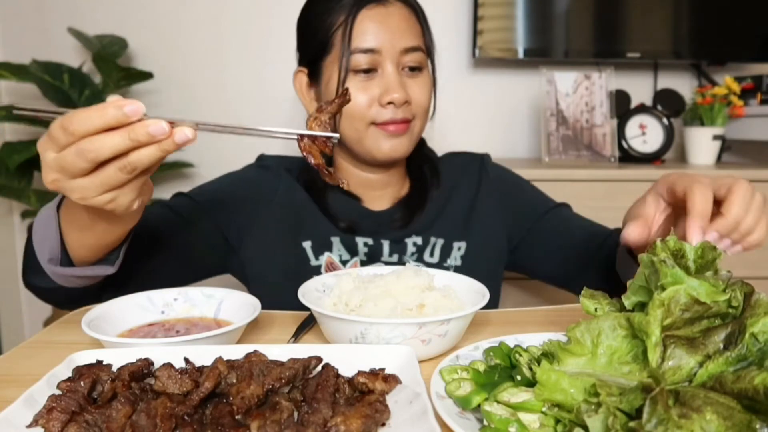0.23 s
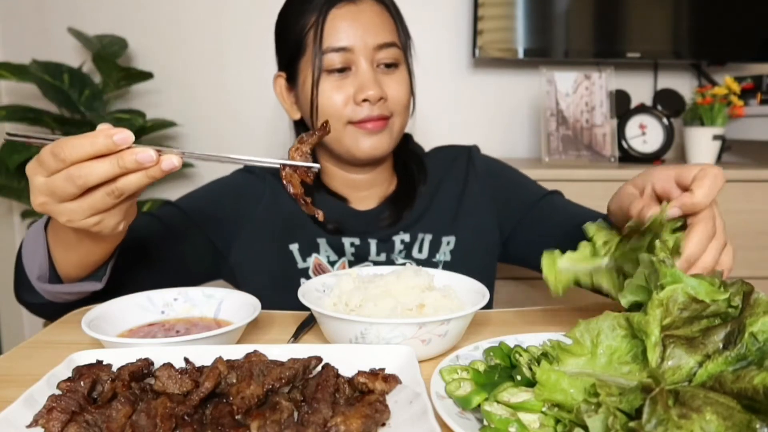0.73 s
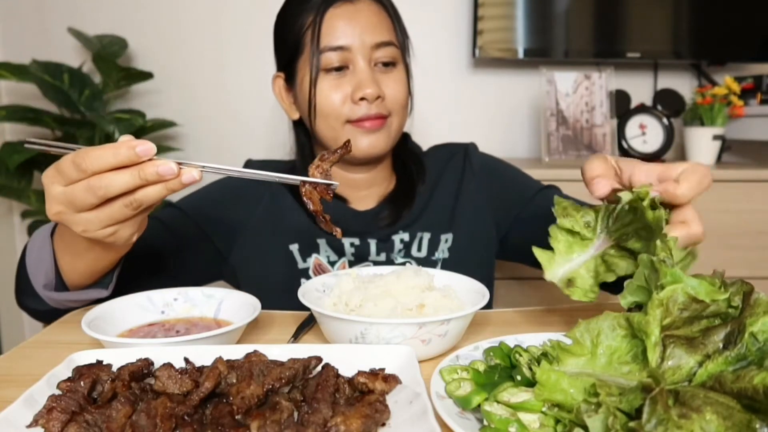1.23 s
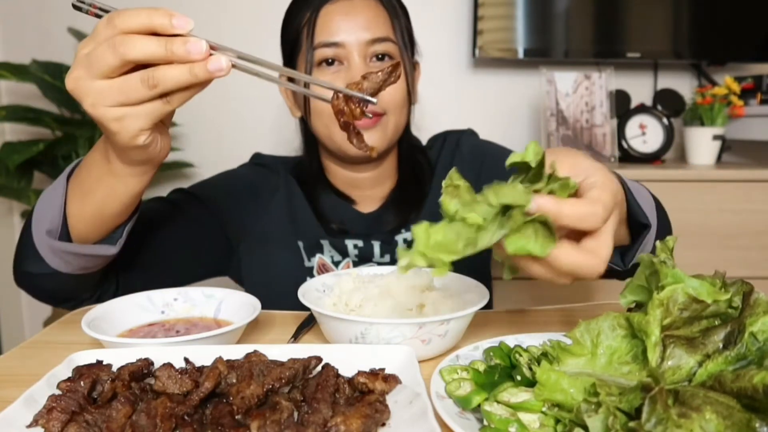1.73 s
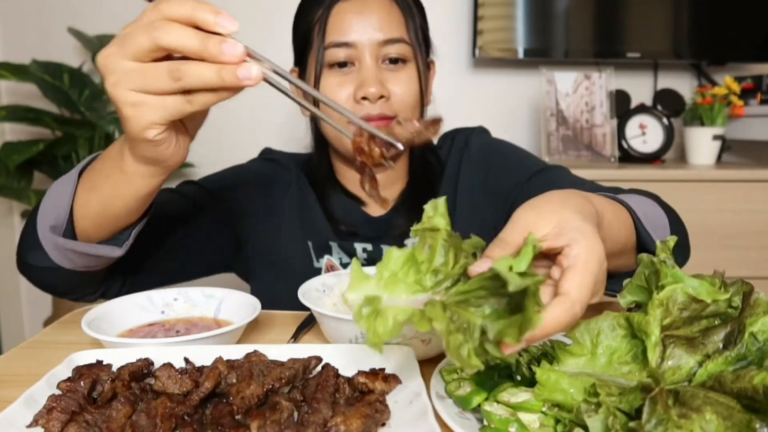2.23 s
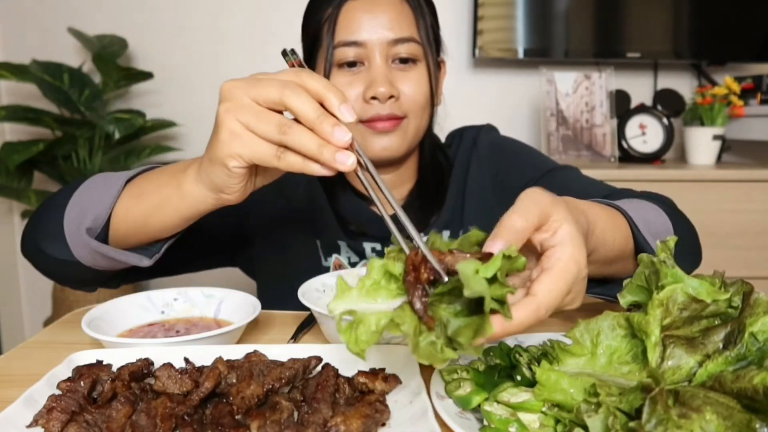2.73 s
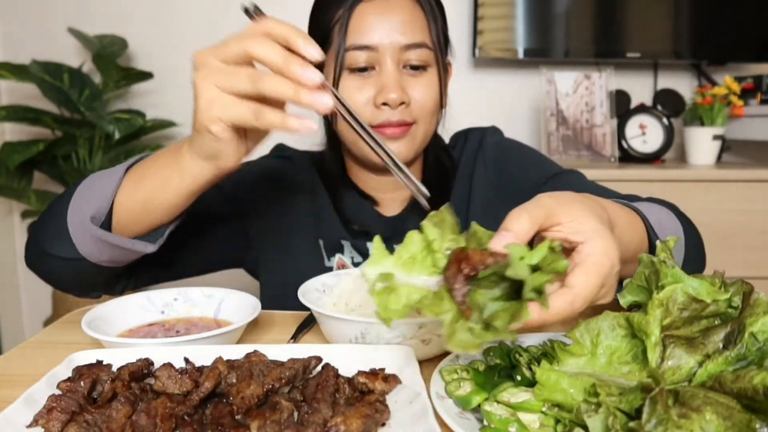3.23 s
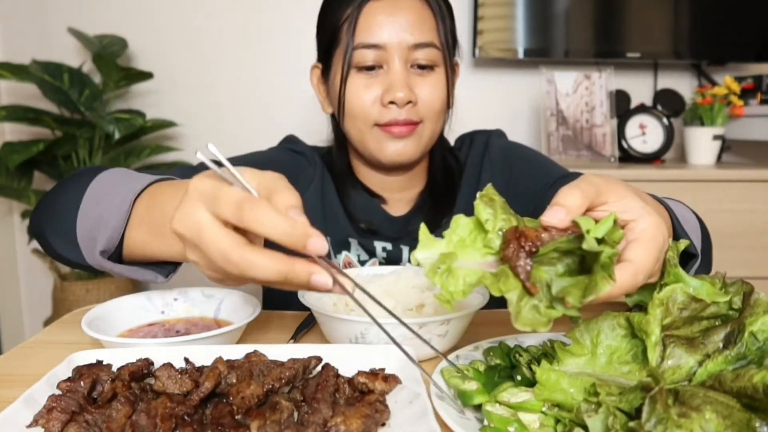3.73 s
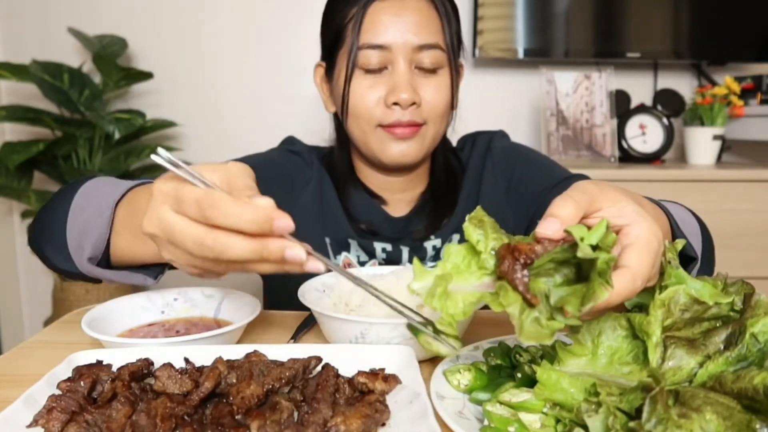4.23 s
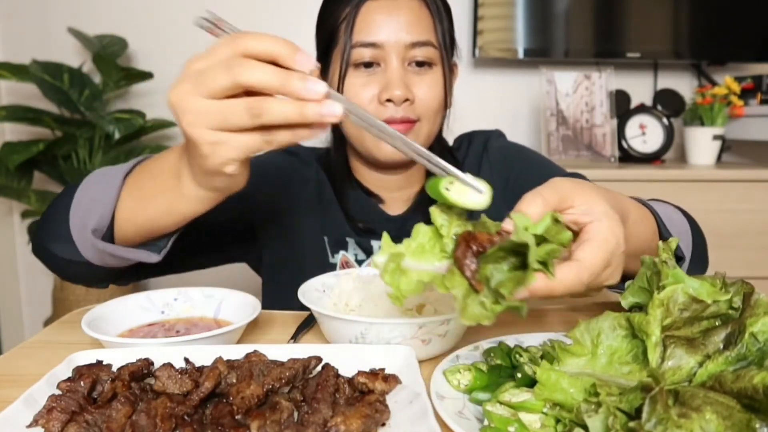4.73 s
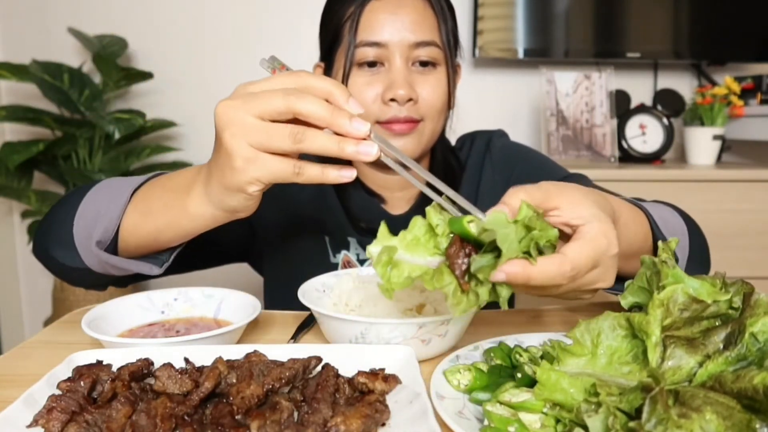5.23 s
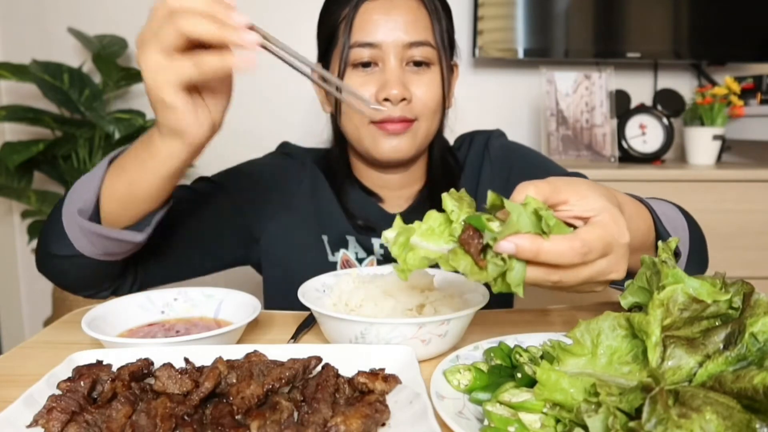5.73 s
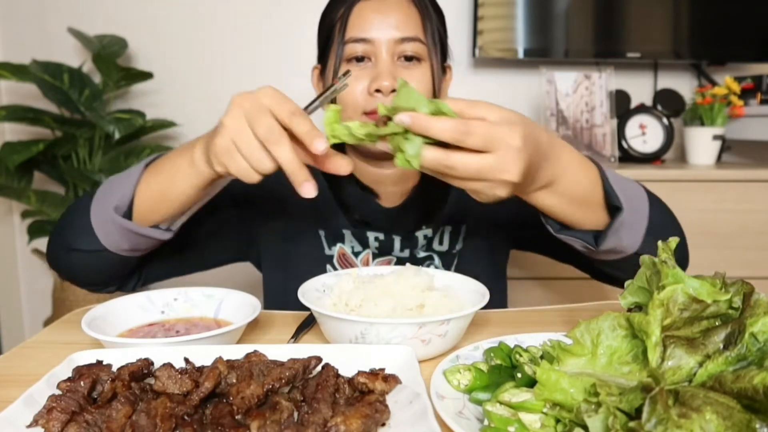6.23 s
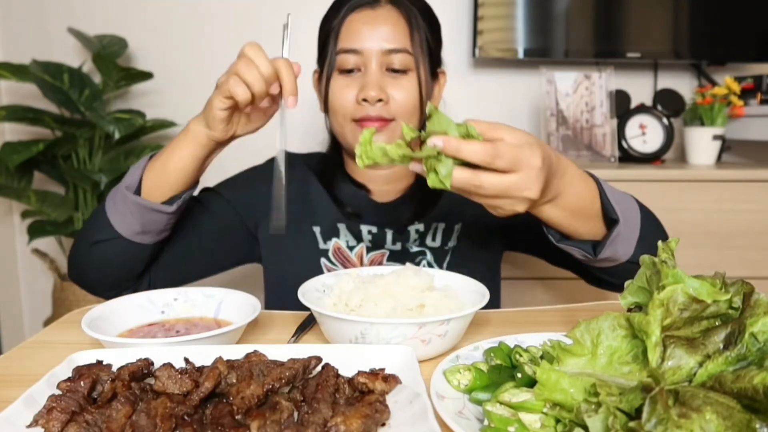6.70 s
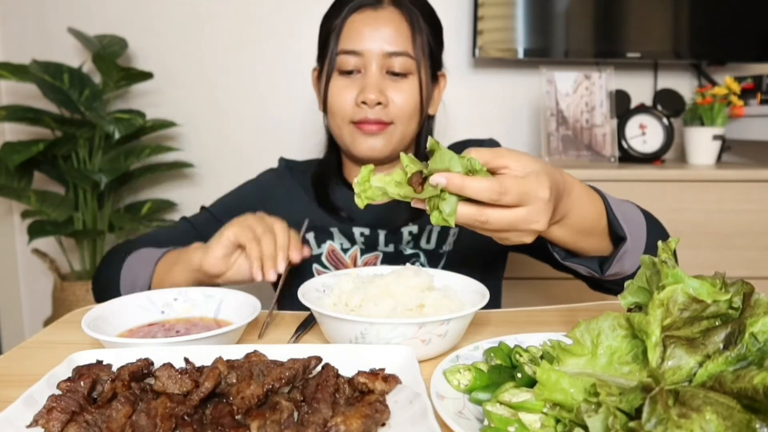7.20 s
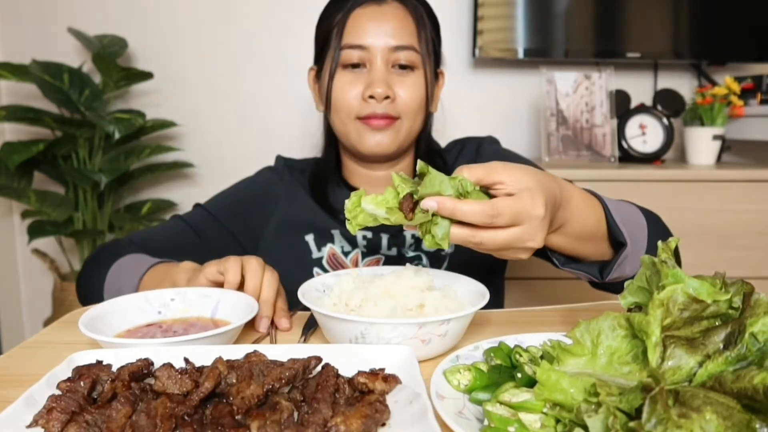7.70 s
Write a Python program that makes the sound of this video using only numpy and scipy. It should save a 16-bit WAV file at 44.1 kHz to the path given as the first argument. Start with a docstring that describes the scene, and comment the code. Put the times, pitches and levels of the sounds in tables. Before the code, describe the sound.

Close to the microphone in a small quiet room, lettuce is picked and shaken with crisp crackles and small wet snaps for two seconds. Softer rustles follow, then steel chopsticks tap a plate briefly. After near silence and faint leaf folds, the sticks knock and scrape on a wooden table, clink, strike a bowl and land hard with a sharp clatter. Faint hiss and hum lie beneath.

```python
"""A dining table in a small quiet room, where lettuce leaves are picked, shaken and folded close by.
The leaves crackle from many tiny filtered clicks, and snap with short noise bursts and two brief rings.
Steel chopsticks tap a plate, tick in the fingers, later slide along the wooden table, clink together,
knock a bowl and are dropped flat: short clicks and rough slips set off the ringing tones of each thing.
Room hiss, a low hum and a thin high whine, made of filtered noise and wavering tones, lie under it all."""
import sys
import numpy as np
from scipy import signal
from scipy.fft import rfft, irfft
from scipy.io import wavfile
from scipy.ndimage import uniform_filter1d

SR = 44100
rng = np.random.default_rng(int(sys.argv[2]) if len(sys.argv) > 2 else 0)


def generate_wav(signal):
    """Clip the signal to [-1, 1] and save it as 16-bit WAV at the path in sys.argv[1]."""
    frames = np.transpose(np.atleast_2d(signal))
    scaled = np.clip(frames, -1, 1) * 32767
    pcm = np.round(scaled).astype(np.int16)
    wavfile.write(sys.argv[1], SR, pcm)


N = 351036  # length in samples


def gain_of(db):
    """Turns decibels into a plain multiplier."""
    return 10 ** (np.asarray(db) / 20)


def evened(x):
    """Scales a signal to an average (rms) size of 1."""
    return x / np.sqrt(np.mean(x ** 2) + 1e-20)


def read(points, hz):
    """Reads a table between its points, with frequency on a log axis."""
    f, value = np.transpose(points)
    return np.interp(np.log(hz + 1), np.log(f + 1), value)


def add(mix, s, sound):
    """Mixes a sound in at second s."""
    part = mix[round(s * SR):][:len(sound)]
    part += sound[:len(part)]


def patches(hz, at, bins, frames):
    """Random smooth blotches over frequency and time, rms 1."""
    blotches = uniform_filter1d(rng.standard_normal((len(at), len(hz))), size=bins)
    return evened(uniform_filter1d(blotches, size=frames, axis=0)).T


def coloured(x, db_of, size=256):
    """Raises or lowers each frequency at each moment by db_of(Hz, s)."""
    hz, t, z = signal.stft(x, SR, nperseg=size)
    return signal.istft(z * gain_of(db_of(hz[:, None], t)), SR, nperseg=size)[1][:len(x)]


def tilted(x, slope_db):
    """Tips the balance of low and high about 2 kHz, in dB per octave, levelling off in the deep bass."""
    octaves = np.log2(np.fft.rfftfreq(len(x), 1 / SR) / 2000 + 0.066)
    return irfft(rfft(x) * gain_of(slope_db * octaves), len(x))


def above(x, edge_hz, order):
    """High-pass: keeps what lies above the edge."""
    return signal.sosfilt(signal.butter(order, edge_hz, "high", fs=SR, output="sos"), x)


def grains(per_s, spread_db):
    """Random clicks of either sign and uneven size, evened to rms 1."""
    size = gain_of(spread_db * np.minimum(rng.exponential(1, N), 4))
    sign = rng.choice([-1., 1.], N)
    return evened(size * sign * (rng.random(N) < per_s / SR))


# colour of the hiss: f/Hz, relative level/dB (per Hz)
HISS_COLOUR = [(20, -40.5), (36, -8.5), (50, -19.5), (83, -13.5), (130, -10.5), (208, -13.5), (270, -16),
               (420, -17.5), (584, -18.5), (700, -23), (2230, -30.5), (4000, -34.5), (7600, -35),
               (15700, -35.5)]
HISS_DB = -67.5  # rms of the hiss above 80 Hz
# colour of the hiss that differs left and right: f/Hz, relative level/dB (per Hz)
SIDE_COLOUR = [(59, -45), (100, -32), (356, -8), (396, -14.5), (430, -7), (643, -12), (15700, -12.5)]
SIDE_DB = -75  # its rms
# wavering tones of hum and whine: f/Hz, speed limit of the wavering/Hz, level/dB (before the lift)
HUM_TONES = [(58.4, 3.6, -66), (240.6, 20, -73), (344, 19, -79), (7850, 0.68, -83.5)]
HUM_LIFT_DB, HUM_WAVER_DB, HUM_WAVER_CYCLES = 2, 0.74, 0.15  # the two wavers are rms


def floor():
    """Steady filtered hiss, tones that waver in level and phase, and a little hiss unlike left and right."""
    a, b = rng.standard_normal((2, N))
    hz = np.fft.rfftfreq(N, 1 / SR)
    t = np.arange(N) / SR
    hiss = irfft(rfft(a) * gain_of(read(HISS_COLOUR, hz)), N)
    hiss *= gain_of(HISS_DB) / np.std(irfft(rfft(hiss) * (hz > 80), N))
    middle = hiss
    for f, width, db in HUM_TONES:
        drift = evened(irfft(rfft(rng.standard_normal(N)) * np.exp(-(hz / width) ** 2), N))
        level = gain_of(db + HUM_LIFT_DB + HUM_WAVER_DB * drift)
        # the phase follows the same drift, one second late
        cycles = f * t + HUM_WAVER_CYCLES * np.roll(drift, SR)
        middle = middle + level * np.sin(2 * np.pi * cycles)
    side = gain_of(SIDE_DB) * evened(irfft(rfft(b) * gain_of(read(SIDE_COLOUR, hz)), N))
    return np.array([middle + side, middle - side])


# how long the room rings: f/Hz, time to fall 60 dB t60/s
ROOM_DECAY = [(200, 0.55), (1000, 0.33), (4000, 0.21), (12000, 0.3)]


def room(x):
    """Sparse echoes of random sign, each band dying at its own speed."""
    taps, at = np.zeros(SR // 2), np.arange(150, SR // 2 - 20, 20)
    taps[at + rng.integers(0, 20, len(at))] = rng.choice([-1., 1.], len(at))
    tail = coloured(taps, lambda hz, t: -60 * t / read(ROOM_DECAY, hz))
    return signal.oaconvolve(x, tail / np.linalg.norm(tail))[:N]


def ringing(modes, contact, tick_db, tick_s):
    """Answer of a struck thing: its dying tones (modes) and the dry noise of the contact."""
    t = np.arange(SR // 2) / SR
    ring = sum(gain_of(db - 60 * t / t60) * np.sin(2 * np.pi * hz * t) for hz, db, t60 in modes)
    tick = evened(coloured(rng.standard_normal(len(t)), lambda hz, at: read(contact, hz)))
    return ring + gain_of(tick_db - 60 * t / tick_s) * tick


def blows(rows, body):
    """Each blow is a first contact and a short chatter; where it lands favours some modes."""
    out, t = np.zeros(N), np.arange(-256, 3840) / SR
    hz = np.fft.rfftfreq(len(t), 1 / SR) + 1
    noises = rng.standard_normal((len(rows), len(t)))
    for (s, db, slope_db, ms, place_hz, place_db, grip_db), noise in zip(rows, noises):
        chatter = 0.084 * noise * (t > 0) * np.exp(-abs(t) * 1000 / ms)
        push = tilted((t == 0) + chatter, slope_db)
        favour = gain_of(place_db * np.exp(-(np.log2(hz / place_hz) / 0.65) ** 2))
        sound = signal.fftconvolve(irfft(rfft(push) * favour), body)
        # the grip damps the ring
        sound *= gain_of(-grip_db * np.arange(len(sound)) / SR)
        add(out, s + t[0], gain_of(db) * sound / abs(sound).max())
    return out


def slide(rows, body, shift_db):
    """Dense uneven slips under the moving tips; the modes swell and sink as the contact wanders."""
    s, db, slope_db = np.transpose(rows)
    t = np.arange(s[0], s[-1], 1 / SR)
    slips = grains(per_s=4500.0, spread_db=0.5)[:len(t)] * gain_of(np.interp(t, s, db))
    rubbed = signal.oaconvolve(slips, body / np.linalg.norm(body))

    def wandering(hz, at):
        slope = np.interp(at + s[0], s, slope_db) * np.log2(hz / 2000 + 0.026)
        return slope + shift_db * patches(hz, at, bins=5, frames=3)
    out = np.zeros(N)
    add(out, s[0], coloured(rubbed, wandering, size=512))
    return out


# In the tables of the sticks, levels hold before the filters in sticks().
# Modes have t60, the time to fall 60 dB with no grip on them. All blows have the same columns:
# t/s, peak level/dB, slope/(dB per octave), chatter/ms, favoured f/Hz, favour/dB, grip damping/(dB per s)

# contact noise on soft things: f/Hz, relative level/dB (per Hz)
SOFT_CONTACT = [(300, -28), (600, -25.5), (1000, 6), (2500, -8.5), (4200, 1), (6500, -16), (7200, -25.5),
                (10000, -31.5), (15700, -46.5)]
# modes of the wood under the tips: f/Hz, relative level/dB, t60/s
WOOD_MODES = [(830, -18, 0.063), (984, 3, 0.069), (1081.5, 4, 0.1), (1181, 6, 0.13), (1230, -4.5, 0.041),
              (1756, 9.5, 0.03), (2120, 4, 0.031), (2206, -16, 0.055), (2646, 3, 0.036), (2693, 8, 0.035),
              (2990, -15.5, 0.044), (2970, -13.5, .04), (3500, -3.5, 0.1), (3586, 5.5, 0.032),
              (3630, 5, 0.024), (3950, -4, 0.21), (4200, -8.5, 0.02), (4340, -16.5, 0.045),
              (4800, -5.5, 0.029), (5000, -20.5, .04), (5680, -21, 0.081), (5960, -36.5, 0.066),
              (6000, -18, 0.061)]


def wood_ring():
    """How the wooden table answers under the tips."""
    return ringing(WOOD_MODES, SOFT_CONTACT, tick_db=16.0, tick_s=0.029)


# contact noise on hard things: f/Hz, relative level/dB (per Hz)
HARD_CONTACT = [(300, -41.5), (900, -1), (2000, -8), (5000, -1), (7000, -12.5), (10000, -6), (15700, -20.5)]
# modes of the plate: f/Hz, relative level/dB, t60/s
PLATE_MODES = [(960, -12.5, 0.16), (1115, 0, 0.027), (1570, -22, 0.072), (1950, 1.5, 0.033),
               (2300, -33, 0.031), (2906, -2, 0.062), (3400, -26, 0.037), (3826, 0, 0.27), (3858, -2, 0.12),
               (4480, -12, 0.036), (4840, -0.5, 0.079), (5350, -10, .04), (5550, 2.5, 0.024),
               (5700, -0.5, 0.056), (7160, -15, 0.095), (7640, -20, 0.66), (8660, -7, 0.059),
               (10300, -11, 0.088), (10930, -13, .06), (13710, -20, .1), (15550, -19, 0.085)]


def plate_ring():
    """How the plate answers under the tips."""
    return ringing(PLATE_MODES, HARD_CONTACT, tick_db=1.0, tick_s=0.026)


# modes of the steel sticks: f/Hz
STEEL_F = [797, 960, 1798, 2216, 3366, 3372, 4466, 4553, 5809, 6821, 7666, 9085, 9145, 10050, 10915, 12152,
           13343, 13388, 14340]
# the same modes in the same order: relative level/dB, t60/s
STEEL_LEVEL_T60 = [(-6.5, 0.22), (-7.5, 0.26), (-11.5, 0.13), (-2, 0.1), (-20, 2.1), (-7.5, 0.12),
                   (5, 0.051), (-15, 0.17), (-11, 0.25), (-32.5, .3), (-22, 0.42), (-26, .15),
                   (-10.5, 0.16), (-25, .1), (-28, .33), (-14.5, 0.16), (-13.5, 0.29), (-5.5, .16),
                   (-31.5, .12)]


def steel_ring():
    """How the steel sticks themselves answer."""
    modes = np.column_stack([STEEL_F, STEEL_LEVEL_T60])
    return ringing(modes, HARD_CONTACT, tick_db=-6.0, tick_s=0.022)


# modes of the rim of a bowl: f/Hz, relative level/dB, t60/s
BOWL_MODES = [(930, -9, .04), (2530, -4, .03), (2690, -6, .04), (3007, -5, .05), (3205, -8, .04),
              (4083, -5, .04), (4237, 0, .12), (4760, -12, .08), (5020, -14, .08), (5660, -9, .04),
              (6500, -14, .03), (8430, -16, .05), (8895, -10, .03), (9125, -13, .06), (9900, -17, .03),
              (12170, -22, .05)]


def bowl_ring():
    """How the rim of the bowl answers."""
    return ringing(BOWL_MODES, SOFT_CONTACT, tick_db=-5.5, tick_s=0.017)


# modes of the whole table top: f/Hz, relative level/dB, t60/s
TOP_MODES = [(200, -26, .08), (350, -20, .04), (470, -11, .035), (620, -14, .03), (780, -6, .03),
             (1000, -10, .03), (1300, -4, .02), (1530, 0, .02), (1760, -1, .025), (2400, -14, .015)]


def table_top_ring():
    """How the whole table top answers, dull and quickly dying."""
    return ringing(TOP_MODES, SOFT_CONTACT, tick_db=0.5, tick_s=0.016)


# taps on the plate, columns as all blows
PLATE_BLOWS = [(3.669, -20, -2, 3.6, 4480, 6, 48), (3.701, -23.5, -6, 2.9, 5000, 10, 50),
               (3.802, -31.5, 2.5, 3.6, 11000, 3, 391), (3.869, -32, 0, 20, 6800, 4, 150)]
# tips skittering over the plate: t/s, level/dB (of the slips), slope/(dB per octave)
PLATE_SKITTER = [(3.672, -34, -3), (3.69, -39, -1.5), (3.712, -33.5, 1), (3.736, -41, -5.5),
                 (3.8, -47, -3.5)]


def on_plate(plate):
    """Tips tap the plate and skitter over it, setting off its modes."""
    return blows(PLATE_BLOWS, plate) + slide(PLATE_SKITTER, plate, shift_db=3.5)


# knocks on the wood, columns as all blows
WOOD_BLOWS = [(7.1755, -14, 3.5, 2.5, 3000, 1.2, 880), (7.179, -11.5, -1.2, 1.1, 3000, 0.9, 600),
              (7.475, -17, -7.5, 5.5, 1000, 4, 50.2), (7.499, -19.5, -8.5, 21, 1200, 4, 50.2),
              (7.5715, -8, -1.5, 1.8, 3000, 3.3, 2490), (7.5735, -11, 0, 1.5, 2530, 3, 2450)]
# sticks dragged along the table: t/s, level/dB (of the slips), slope/(dB per octave)
WOOD_SLIDE = [(7.18, -51, 12), (7.186, -27.5, -2), (7.334, -21.5, 1.5), (7.38, -21, 3), (7.468, -53.5, -2)]


def on_wood(wood):
    """Sticks knock on the wooden table and drag along it, setting off the modes under the tips."""
    return blows(WOOD_BLOWS, wood) + slide(WOOD_SLIDE, wood, shift_db=2.0)


# contact noise of steel on steel: f/Hz, relative level/dB (per Hz)
PINCH_CONTACT = [(1000, -26), (3000, -6), (5500, -0.5), (8000, -2), (12000, -2.5), (15700, -1)]
# modes of the sticks pinched in the fingers: f/Hz, relative level/dB, t60/s
PINCHED_MODES = [(4200, -20, .04), (4960, -9, 0.11), (5900, -12, .1), (7300, -15, .06), (8220, -8, .14),
                 (8820, -20, .05), (10300, -3.5, 0.058), (12300, -13, .04), (13200, -16, .04),
                 (14600, -16, .04)]
# ticks as the grip shifts, columns as all blows
GRIP_BLOWS = [(5.742, -47.5, 0, 2, 10300, 6, 200), (5.959, -50, -3, 2, 4200, 8, 200),
              (5.970, -36, 4, 3, 13000, 3, 300), (5.979, -33, 3.5, 7.5, 5700, 3.3, 50),
              (5.988, -48, 2, 5.3, 12300, 4.5, 50), (6.080, -44, 0, 4.4, 10300, 3, 20),
              (6.097, -44, 2.5, 5, 9000, 4, 20), (6.599, -53, 1, 2, 6200, 9.9, 50)]


def in_fingers():
    """Pinched sticks tick as the grip shifts."""
    return blows(GRIP_BLOWS, ringing(PINCHED_MODES, PINCH_CONTACT, tick_db=2.5, tick_s=0.065))


# clinks of the steel sticks, columns as all blows
STEEL_BLOWS = [(7.474, -8.5, -.5, 7.4, 2300, 1.6, 150), (7.498, -15, .5, 6.4, 8820, 5, 100),
               (7.585, -27.5, .5, 1.5, 9430, 11, 450), (7.6206, -25, .5, 1.2, 11060, 5.5, 5)]
# knocks on the bowl, columns as all blows
BOWL_BLOWS = [(7.6003, -5, 0.52, 4.4, 2990, 2, 25), (7.6047, -5, .5, 1.9, 2700, 3, 38),
              (7.6085, -7, 0.36, 3, 4240, 2.2, 5)]
# dull knocks of the table top, columns as all blows
TOP_BLOWS = [(3.869, -36.5, -9, 6.3, 300, 5.8, 5), (3.897, -42, -8, 13, 368, 10, 5),
             (7.579, -22.5, 3.5, 2.1, 1820, 2, 43), (7.585, -13.5, 0.5, 10.8, 1200, 1.85, 39),
             (7.6152, -1, 3.5, 1.1, 1516, 2, 82), (7.6195, -4, 3.5, 3.04, 948, 13.3, 63),
             (7.821, -47, -1.5, 3.5, 1490, 6.1, 50)]
RATTLE_DB = 2.5  # loose contact makes each ring flicker by this much (rms)


def sticks():
    """Every contact of the chopsticks; thin sticks give off little bass, so the lows are held back."""
    wood, plate, steel = wood_ring(), plate_ring(), steel_ring()
    bowl, top = bowl_ring(), table_top_ring()
    light = on_plate(plate) + blows(STEEL_BLOWS, steel)
    light += on_wood(wood) + blows(BOWL_BLOWS, bowl)
    light += in_fingers()
    light = coloured(light, lambda hz, at: RATTLE_DB * patches(hz, at, bins=3, frames=2))
    bass_trace = gain_of(-18.0) * light  # comes through the table
    return above(light, 756.0, order=5) + bass_trace + above(blows(TOP_BLOWS, top), 240.0, order=2)


# each squeeze, pull or fold of the leaves:
# peak t/s, rustle level/dB, swell/s, fade/s, treble over it/dB, body (lower part) over it/dB
LEAF_SQUEEZES = [(0.455, -55, 0.1, .06, 4.5, 3.5), (0.524, -50, 0.047, 0.076, 6.5, 2),
                 (0.66, -68, 0.12, 0.14, 1, 5), (0.762, -60, 0.087, .05, 6, 2),
                 (0.9, -58, 0.14, 0.28, 6, 3), (1.012, -53.5, 0.083, 0.14, 8.5, -1.5),
                 (1.166, -61.5, 0.023, 0.069, -1, 2.5), (1.29, -63.5, 0.074, 0.12, 8, 1.5),
                 (1.372, -50.5, 0.035, 0.11, 1.5, -1), (1.578, -50, 0.073, 0.041, 8, 1),
                 (1.648, -49, .04, 0.063, 1.5, -7.5), (1.748, -52, 0.031, 0.072, 5, -2.5),
                 (1.952, -50, 0.079, 0.065, 5, -3), (2.06, -63, 0.15, 0.13, 3.5, -3),
                 (2.49, -71, 0.069, .1, 12, 11), (2.628, -58.5, 0.12, 0.12, -4, -5),
                 (2.754, -67, 0.076, 0.11, 10.5, 2), (3.08, -72, 0.082, 0.065, 3, 5),
                 (3.172, -62.5, 0.15, 0.046, 1, 2), (4.8, -70, 0.02, 0.036, 1, -7),
                 (4.95, -75, .05, .03, 1, 7), (5.02, -72.5, 0.06, .08, 13, 0),
                 (5.4, -72, 0.058, 0.23, 8, -1), (5.52, -75, 0.12, 0.08, 2, 2),
                 (5.75, -71.5, 0.093, .08, 13, 1), (5.99, -61, 0.022, 0.051, 19, -3),
                 (6.37, -66.5, 0.04, 0.083, 8, -2), (6.47, -62.5, 0.065, .08, 12, 3),
                 (6.53, -55, 0.051, 0.032, 8, -0.5), (6.6, -72, 0.018, 0.17, 13, 2),
                 (6.82, -72, .03, .15, 8, 7)]
SQUEEZE_SPAN_DB = 15  # a squeeze rises or falls this far in its swell or fade time
HELD_DB, HELD_TREBLE_DB, HELD_BODY_DB = -80.5, -5, 2.5  # leaves held still


def handling(at):
    """Power of all squeezes over the held leaves, and the treble and body of whichever are loudest."""
    s, db, swell, fade, treble_db, body_db = np.transpose(LEAF_SQUEEZES)[:, :, None]
    away = np.where(at < s, (s - at) / swell, (at - s) / fade)
    power, held = gain_of(db - SQUEEZE_SPAN_DB * away) ** 2, gain_of(HELD_DB) ** 2
    total = power.sum(0) + held
    treble = ((power * treble_db).sum(0) + held * HELD_TREBLE_DB) / total
    body = ((power * body_db).sum(0) + held * HELD_BODY_DB) / total
    return 10 * np.log10(total), treble, body


# colour of the leaves, for rustle and snaps: f/Hz, relative level/dB (per Hz)
LEAF_COLOUR = [(180, -43.5), (300, -0.5), (611, -8), (698, -5.5), (1070, 1), (2050, -5), (3840, 1),
               (5350, 1.5), (7450, -15.5), (9550, -10.5), (15700, -25.5)]


def rustle():
    """Fine clumped crackle of creasing leaves, each crease with its own pitch; handling shapes its tone."""
    clumps = evened(uniform_filter1d(rng.standard_normal(N), size=500))
    crackle = grains(per_s=4000., spread_db=-0.5) * gain_of(2. * clumps)
    fine = coloured(crackle, lambda hz, at: read(LEAF_COLOUR, hz)
                    + 3.25 * patches(hz, at, bins=6, frames=2), size=128)
    # scattered larger creases pop at narrow pitches
    pops = coloured(grains(per_s=310.0, spread_db=4.0), lambda hz, at: read(LEAF_COLOUR, hz)
                    + 7.9 * patches(hz, at, bins=3, frames=2))
    creases = evened(fine) + gain_of(-4.5) * evened(pops)

    def handled(hz, at):
        treble = np.clip((hz - 6000) / 1500, 0, 1)
        body = np.clip((2800 - hz) / 800, 0, 1)
        db, treble_db, body_db = handling(at)
        return db + treble * treble_db + body * body_db
    return coloured(evened(creases), handled)


# single snaps of ribs and wet folds:
# t/s, peak level/dB, low ring f/Hz, high ring f/Hz, share of the low ring (next to a tick of peak 1)
LEAF_SNAPS = [(0.819, -38.5, 1330, 5270, 2.5), (0.834, -42, 1200, 5400, 0.56),
              (0.924, -31.5, 4200, 4600, .29), (0.964, -41.5, 1180, 5050, 1),
              (1.018, -23, 4000, 5150, 0.22), (1.066, -41, 3860, 5800, 0.28), (1.163, -46, 3680, 5190, 0.5),
              (1.376, -44, 3350, 5000, 1.5), (1.393, -53, 3600, 4550, .35), (1.571, -28, 826, 3300, 0.35),
              (1.627, -38, 3930, 5680, .35), (1.661, -42, 3040, 5390, 0.36), (1.729, -44, 4500, 4900, .35),
              (1.748, -40, 4750, 4830, 0.56), (1.893, -38.5, 3380, 5200, 0.38),
              (1.911, -43, 3600, 4730, 0.3), (2.075, -39.5, 3060, 5080, 0.62),
              (2.085, -46, 3780, 6100, .41), (2.201, -46, 3900, 4690, 0.8), (3.077, -39.5, 3830, 4430, .44),
              (4.796, -39.5, 3390, 6110, 0.32), (4.942, -47.5, 3870, 4860, 0.2),
              (5.747, -48, 2300, 9900, .58), (5.761, -45.5, 1090, 9120, 0.65), (6.364, -49, 1070, 4790, .2),
              (6.558, -43.5, 1070, 4870, 0.23), (6.823, -42.5, 3380, 5070, 0.35),
              (6.861, -51, 3470, 5540, 0.53)]
SNAP_MS, SNAP_HIGH_SHARE = 1.16, 0.32  # fade time of the tick, share of the high ring
SNAP_SLOPE_DB, SNAP_SLOPE_PER_DB = -2., 0.36  # tilt per octave; a brighter squeeze snaps brighter


def snaps():
    """A tick in a softened leaf colour with two short rings of the fold that gives way."""
    out, t = np.zeros(N), np.arange(-256, 1792) / SR
    colour = gain_of(0.42 * read(LEAF_COLOUR, np.fft.rfftfreq(len(t), 1 / SR)))
    noises = rng.standard_normal((len(LEAF_SNAPS), len(t)))
    for (s, db, low_hz, high_hz, low_share), noise in zip(LEAF_SNAPS, noises):
        fade = (t >= 0) * np.exp(-abs(t) * 1000 / SNAP_MS)
        slope_db = SNAP_SLOPE_DB + SNAP_SLOPE_PER_DB * handling(s)[1]
        tick = irfft(rfft(tilted(noise * fade, slope_db)) * colour)
        low = low_share * np.sin(2 * np.pi * low_hz * t)
        high = SNAP_HIGH_SHARE * np.sin(2 * np.pi * high_hz * t)
        # the rings outlast the tick
        sound = tick / abs(tick).max() + (low + high) * fade ** 0.4
        add(out, s + t[0], gain_of(db) * sound / abs(sound).max())
    return out


def scene():
    """Leaves and sticks close by, the room behind them, the floor under all."""
    near = sticks() + above(rustle() + snaps(), 180.0, order=2)
    return near + gain_of(-9.5) * room(near) + floor()


def record(dry):
    """Loud peaks are softly rounded off as the input saturates; then the top end is cut at 15.8 kHz."""
    rounded = 1.072 * np.tanh(dry / 1.126)
    low_pass = signal.firwin(511, 15800, window=("kaiser", 9), fs=SR)
    return signal.oaconvolve(rounded, low_pass[None], "same")


dry = scene()
out = record(dry)
generate_wav(out)
```